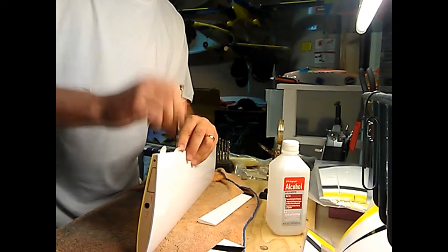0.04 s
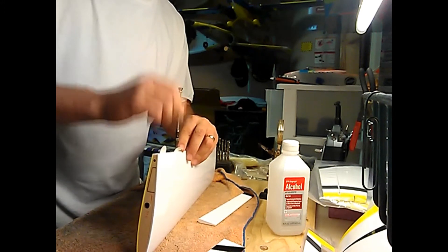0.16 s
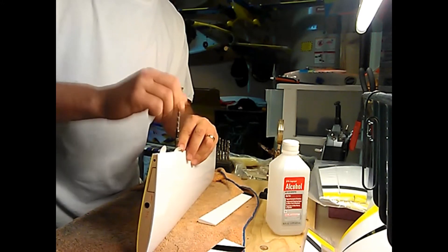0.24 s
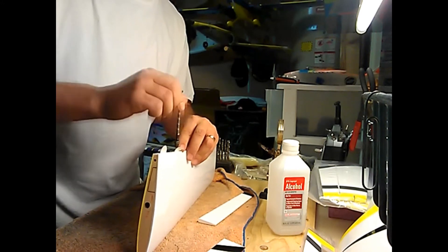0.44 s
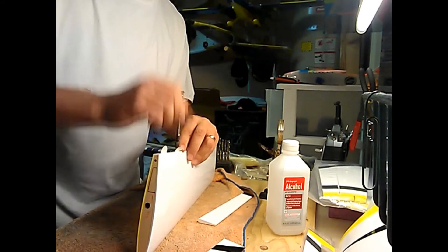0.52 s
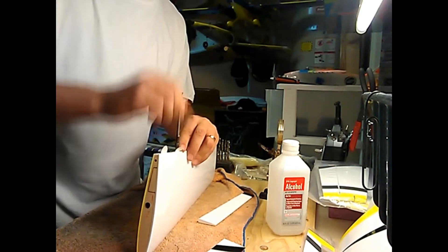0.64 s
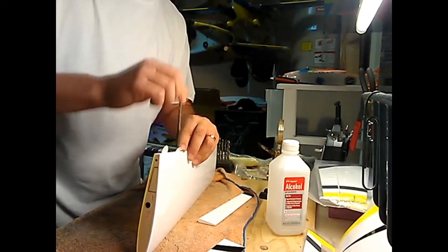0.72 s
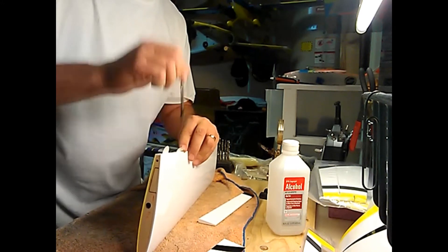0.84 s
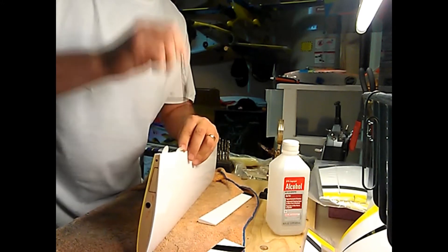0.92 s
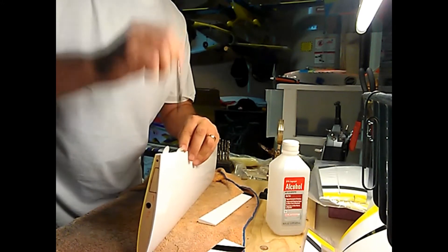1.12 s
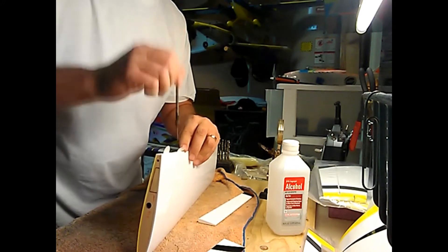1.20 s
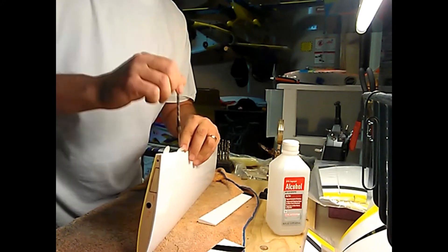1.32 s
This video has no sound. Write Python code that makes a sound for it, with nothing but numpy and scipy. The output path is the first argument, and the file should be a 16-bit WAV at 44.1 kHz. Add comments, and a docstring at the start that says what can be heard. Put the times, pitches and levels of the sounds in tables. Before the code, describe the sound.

Close up in a small, quiet workshop, a hand-turned drill bit rasps in a foam panel's edge with small hollow knocks. After one louder snap it slides out with a brighter scrape, and a light tap follows.

```python
"""Hand drill bit in a foam panel

A small workshop, a stereo microphone close by, the work a little to its left. A drill bit is twisted
by hand in the panel's edge: each twist crumbles foam in a short rasp, and where the flutes catch and
let go, the panel knocks. The bit slides out with a brighter scrape and a last flick, and later
touches the edge once more."""
import sys
import numpy as np
from scipy import signal
from scipy.fft import rfft, irfft
from scipy.io import wavfile
from scipy.ndimage import uniform_filter1d

SR = 44100
rng = np.random.default_rng(int(sys.argv[2]) if len(sys.argv) > 2 else 0)


def inscribe(sig):
    """Save sig as 16-bit PCM at rate SR to the path in sys.argv[1].

    A 1-D sig is mono; a 2-D sig holds one channel per row.
    Samples are clipped to [-1, 1] before scaling.
    """
    pcm = np.round(np.clip(np.atleast_2d(sig).T, -1, 1) * 32767)
    wavfile.write(sys.argv[1], SR, pcm.astype(np.int16))


N = 59535  # 1.35 s


def amp(db):
    """Decibels to gain."""
    return 10 ** (np.asarray(db) / 20)


def unit_rms(x):
    """Scales to rms 1."""
    return x / np.sqrt(np.mean(x ** 2) + 1e-20)


def at_hz(points, hz):
    """Reads a table on a log-frequency axis."""
    table_hz, value = np.transpose(points)
    return np.interp(np.log(hz + 1), np.log(table_hz + 1), value)


def envelope(rows, column=1):
    """Gain over time from one dB column, silent before the first row."""
    rows = np.array(rows)
    return amp(np.interp(np.arange(N) / SR, rows[:, 0], rows[:, column], left=-140))


RASP_LEFT_DB, FIZZ_LEFT_DB, PANEL_LEFT_DB, SNAP_LEFT_DB = 4, 2.7, 4, 5
def pan(left_db):
    """Channel gains, the left louder by left_db."""
    return amp(np.array([[left_db], [-left_db]]) / 2)


def stereo(pair, likeness):
    """Makes two unrelated signals partly alike."""
    return np.array([pair[0], likeness * pair[0] + np.sqrt(1 - likeness ** 2) * pair[1]])


def delay_left(x, lag_s):
    """The sound reaches the left side of the microphone later."""
    hz = np.fft.rfftfreq(N, 1 / SR)
    return irfft(rfft(x) * np.exp(-2j * np.pi * hz * np.array([[lag_s], [0]])), N)


def add(mix, start_s, sound):
    """Mixes a sound in at a time."""
    part = mix[:, round(start_s * SR):][:, :sound.shape[-1]]
    part += sound[..., :part.shape[1]]


def ring(modes, rise_s=0.00039, rise_cycles=4.48):
    """One blow on a set of modes, each swelling over its first cycles."""
    t, out = np.arange(SR // 4) / SR, 0
    for hz, db, t60, lag in modes:
        age = np.maximum(t - lag, 0)
        rise = np.sin(np.pi / 2 * np.minimum(age / (rise_s + rise_cycles / hz), 1)) ** 2
        out = out + rise * amp(db - 60 * age / t60) * np.sin(2 * np.pi * hz * age)
    return out


# Room tone around the microphone: frequency_hz, relative_db
AIR_COLOUR = [(25, -9), (60, -34), (100, -30), (140, -41), (220, -18.5), (324, -6), (550, -4.5),
              (850, -0.5), (1050, -4.5), (1900, -5), (4000, -9.5), (9000, -17), (13000, -16.5)]
# How alike it is left and right: frequency_hz, likeness
AIR_LIKENESS = [(50, 0.39), (500, 0.74), (1500, 0.13), (4000, 0.38), (9000, 0.044)]
def room_tone(level_db=-61):
    """Steady hiss of the workshop air."""
    hz = np.fft.rfftfreq(N, 1 / SR)
    white = stereo(rfft(rng.standard_normal((2, N))), at_hz(AIR_LIKENESS, hz))
    hiss = irfft(white * amp(at_hz(AIR_COLOUR, hz)), N)
    return amp(level_db) * unit_rms(hiss) * pan(left_db=2.0)


# Decay of the small workshop: frequency_hz, t60_s
ROOM_DECAY = [(100, 0.45), (500, 0.82), (2000, 0.53), (4000, 0.7), (9000, 0.46)]
def reflections(x, tail_db=-10.5, early_db=-3, early_decay_s=0.0092, gap_s=0.0078):
    """Quick reflections off the bench, then the tail of the workshop."""
    t = np.arange(SR * 3 // 4) / SR
    shape = (2, len(t))
    taps = rng.choice([-1., 1.], shape) * (rng.random(shape) < 4000 / SR)
    hz, age, spectrum = signal.stft(taps, SR, nperseg=256)
    decay = amp(-60 * age / at_hz(ROOM_DECAY, hz)[:, None])
    tail = signal.istft(spectrum * decay, SR, nperseg=256)[1][:, :len(t)]
    tail *= np.clip(t / gap_s - 1, 0, 1)
    early = rng.standard_normal(shape) * (rng.random(shape) < 2000 / SR)
    early *= (t > .002) * np.exp(-t / early_decay_s)
    response = sum(amp(db) * part / np.linalg.norm(part, axis=1, keepdims=True)
                   for db, part in [(tail_db, tail), (early_db, early)])
    return signal.fftconvolve(x, response, axes=1)[:, :N]


# Fingers shifting on the panel, faint even up close: time_s, level_db
FINGER_RUB = [(1.08, -73), (1.15, -72), (1.185, -69), (1.193, -63), (1.24, -66.5), (1.275, -77.5),
              (1.35, -88)]
# The tip landing on the edge again: start_s, level_db
TIP_LANDINGS = [(1.1902, -46.5), (1.1949, -45)]
# Ring of the tip: pitch_hz, relative_db, t60_s, lag_s
TIP_MODES = [(238, -10, 0.053, 0.00011), (3750, -0.5, 0.04, 0.00024), (3880, 0, .018, 0.00023),
             (4170, -5, 0.02, 0.00024)]
def touches():
    """The tip ticks on the edge while the fingers rub the panel faintly."""
    rub = crumble(RASP_COLOUR, RASP_LIKENESS) + amp(-1) * crumble(FIZZ_COLOUR, FIZZ_LIKENESS)
    out = envelope(FINGER_RUB) * rub
    for start, db in TIP_LANDINGS:
        add(out, start, amp(db) * ring(TIP_MODES))
    return out * pan(PANEL_LEFT_DB)


# Steel creaking in the foam: start_s, length_s, pitch_hz, level_db
STEEL_CREAKS = [(.010, 0.013, 2150, -58), (0.159, 0.051, 3870, -48.5), (0.245, 0.026, 861.6, -45.5),
                (0.326, 0.0069, 930, -47), (0.388, 0.022, 3250, -39.5), (0.422, 0.026, 2204, -37)]
def creaks(waver_hz=113):
    """The steel sticks and slips for a moment at an unsteady pitch."""
    out = np.zeros((2, N))
    for start, length, hz, db in STEEL_CREAKS:
        t = np.arange(0, length, 1 / SR)
        waver = unit_rms(uniform_filter1d(rng.standard_normal(SR // 10), size=100))[:len(t)]
        tone = np.sin(2 * np.pi * np.cumsum(hz + waver_hz * waver) / SR)
        add(out, start, amp(db) * np.sin(np.pi * t / length) * tone * pan(RASP_LEFT_DB))
    return out


# A flute breaking through the foam: start_s, level_db
FOAM_TEARS = [(0.4185, -32)]
# Colour of the tear: frequency_hz, relative_db
TEAR_COLOUR = [(50, -14), (150, -23), (300, -17), (500, -6), (800, -13), (1300, 2), (1800, -18), (2600, -1),
               (3400, -15), (5200, -5), (6300, -13), (7200, -23), (9000, -38)]
def tears(rise_s=0.0033):
    """Many cells give way at once: a short, dry crunch."""
    burst = 0
    for start, db in FOAM_TEARS:
        age = np.maximum(np.arange(N) / SR - start, 0) / rise_s
        burst = burst + amp(db) * age * np.exp(1 - age)
    return burst * crumble(TEAR_COLOUR, RASP_LIKENESS) * pan(PANEL_LEFT_DB)


# Flutes letting go, close on the left: start_s, thud_hz, thud_db, panel_db, snap_db, tick_db
FLUTE_CATCHES = [(.0965, 428, -41, -36, -44, -60.5), (.2120, 383, -38, -24, -30, -34),
                 (.2545, 380, -68, -50, -69, -55), (.3215, 422, -33.5, -53, -29, -37.5),
                 (.4183, 445, -31.5, -15.5, -13, -30.5), (.5335, 370, -53, -49, -30, -28.5)]
# Low, middle and high ring of a catch: pitch_hz, relative_db, t60_s, lag_s
PANEL_MODES = [(543, -19, 0.015, .003), (669.5, -2, 0.039, 0.0031), (1005, -4, 0.028, 0.00208),
               (1223, -3, 0.016, 0.00074), (1519, -7, .02, 0.00086)]  # slow low bending waves arrive late
SNAP_MODES = [(2096, -5.5, 0.019, 0.00008), (2206, -4.5, 0.019, 0.00022), (2400, -23, 0.037, 0.0013),
              (3180, -15, 0.017, 0.00107)]
TICK_MODES = [(3890, 0, .028, 0.00034), (4093, 0, 0.033, 0.000566), (4730, -2.5, 0.014, 0.006),
              (6100, -17, 0.023, 0.0009)]
def catches(thud_t60_s=.04, thud_lag_s=0.00099):
    """A flute lets go with a snap, and the panel answers with a hollow knock."""
    out = np.zeros((2, N))
    for start, thud_hz, thud_db, panel_db, snap_db, tick_db in FLUTE_CATCHES:
        thud = ring([(thud_hz, thud_db, thud_t60_s, thud_lag_s)])
        knock = thud + amp(panel_db) * ring(PANEL_MODES) + amp(tick_db) * ring(TICK_MODES)
        snap = amp(snap_db) * ring(SNAP_MODES)
        add(out, start, knock * pan(PANEL_LEFT_DB) + snap * pan(SNAP_LEFT_DB))
    return out


# Resonances of bit and panel: centre_hz, width_hz, boost_db
RESONANCES = [(696, 120, -0.5), (1050, 160, 2), (2058, 53, 7.5), (3060, 160, 1.5), (3855, 170, 7.5),
              (4110, 220, 4), (7920, 110, 7.5), (7890, 150, 6), (8510, 47, 10), (8790, 88, 1)]
def crumble(colour, likeness, grains_per_s=9000, spread_db=4, chatter_db=1.5, chatter_hz=170):
    """Foam cells break in chattering clumps; each click rings the bit and the panel."""
    slow = signal.butter(2, chatter_hz, fs=SR, output="sos")
    chatter = unit_rms(signal.sosfilt(slow, rng.standard_normal(N)))
    size = amp(spread_db * np.minimum(rng.exponential(1, (2, N)), 4) + chatter_db * chatter)
    breaks = size * rng.choice([-1., 1.], (2, N)) * (rng.random((2, N)) < grains_per_s / SR)
    hz = abs(np.fft.fftfreq(4096, 1 / SR))
    boost_db = sum(db / (1 + (2 * (hz - centre) / width) ** 2) for centre, width, db in RESONANCES)
    log_gain = np.log(amp(at_hz(colour, hz) + boost_db))
    click = np.fft.ifft(np.exp(signal.hilbert(log_gain).conj())).real[:2048]  # minimum phase
    crunch = signal.oaconvolve(stereo(breaks, likeness), click[None])[:, :N]
    return unit_rms(signal.sosfilt(signal.butter(4, 11000, fs=SR, output="sos"), crunch))


RASP_LIKENESS, FIZZ_LIKENESS = 0.58, 0.73  # between left and right
# Coarse and fine crumbling, heard up close: frequency_hz, relative_db
RASP_COLOUR = [(60, -30), (150, -43.5), (300, -13), (420, -11), (700, -0.5), (1700, -2), (2300, -0.5),
               (3300, -1), (4200, -6.5), (4600, -9.5), (6500, -9.5), (9000, -31.5)]
FIZZ_COLOUR = [(60, -27), (200, -39), (1500, -6.5), (3500, -26), (4050, -2), (4600, -6.5), (5400, -6.5),
               (6100, 0), (7300, -1), (8000, -3), (9000, 6)]
# Twists of the bit in the panel's edge: start_s, hardest_s, end_s, rasp_db, fizz_db
BIT_TWISTS = [(.002, 0.01, 0.056, -56.5, -52.5), (0.018, 0.084, .120, -48.5, -46),
              (0.112, .141, 0.156, -46.5, -62.5), (0.146, 0.164, 0.26, -45, -52),
              (0.235, 0.257, 0.291, -45.5, -50.5), (0.273, 0.315, 0.342, -42.5, -46.5),
              (0.328, 0.426, .446, -39.5, -49.5)]
# The bit sliding out: time_s, rasp_db, fizz_db
BIT_PULL = [(.405, -56, -53), (.44, -48.5, -40.5), (.468, -43.5, -37), (.497, -39.5, -36.5),
            (.507, -62, -35), (.527, -45.5, -32), (.535, -40.5, -29.5), (.546, -51, -59.5),
            (.556, -54, -78), (.60, -57, -70), (.68, -74.5, -74.5)]
def scraping(swell_exponent=0.77, release_exponent=1.14):
    """The twists and the pull grind the foam: a coarse rasp and a fine fizz."""
    t = np.arange(N) / SR
    rasp_power = envelope(BIT_PULL, column=1) ** 2
    fizz_power = envelope(BIT_PULL, column=2) ** 2
    for start, hardest, end, rasp_db, fizz_db in BIT_TWISTS:
        swell = np.clip((t - start) / (hardest - start), 0, 1) ** swell_exponent
        release = np.clip((end - t) / (end - hardest), 0, 1) ** release_exponent
        rasp_power += (swell * release * amp(rasp_db)) ** 2
        fizz_power += (swell * release * amp(fizz_db)) ** 2
    fizz = np.sqrt(fizz_power) * delay_left(crumble(FIZZ_COLOUR, FIZZ_LIKENESS), lag_s=.00003)
    rasp = np.sqrt(rasp_power) * crumble(RASP_COLOUR, RASP_LIKENESS)
    return rasp * pan(RASP_LEFT_DB) + fizz * pan(FIZZ_LEFT_DB)


def scene():
    """The handwork close to the microphone, the workshop behind it."""
    rubs = scraping() + creaks() + touches()
    knocks = delay_left(catches() + tears(), lag_s=.00005)
    return rubs + knocks + reflections(rubs + amp(-2) * knocks) + room_tone()


# Response of the recorder: frequency_hz, gain_db
RECORDER_RESPONSE = [(0, 0), (8950, 0), (9060, -24), (9200, -40), (9700, -62), (11400, -58), (11800, -23),
                     (12950, -19), (13200, -60)]
def record(dry):
    """The recorder passes little above 9 kHz and cuts off at 13.4 kHz."""
    hz = np.fft.rfftfreq(2 * N, 1 / SR)
    gain = amp(np.interp(hz, *np.transpose(RECORDER_RESPONSE)))
    dull = irfft(rfft(dry, 2 * N) * gain, 2 * N)[:, :N]
    band_limit = signal.firwin(511, 13399, window=("kaiser", 9), fs=SR)
    return signal.oaconvolve(dull, band_limit[None], "same")


dry = scene()
out = record(dry)
inscribe(out)
```